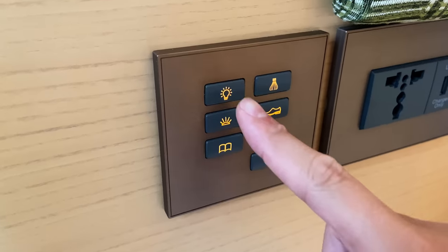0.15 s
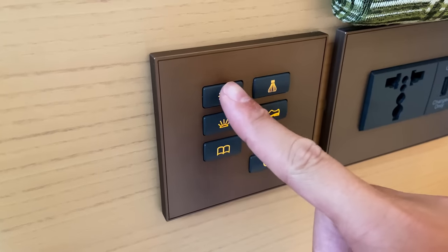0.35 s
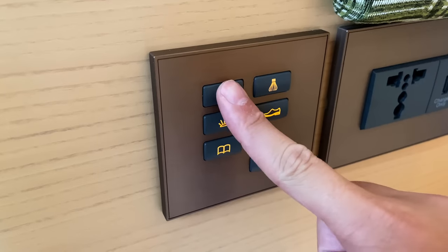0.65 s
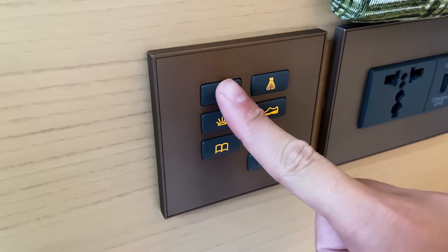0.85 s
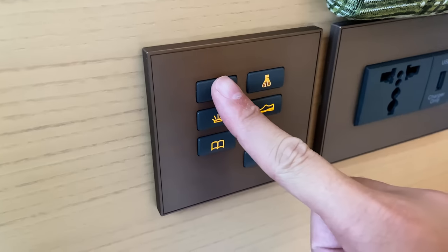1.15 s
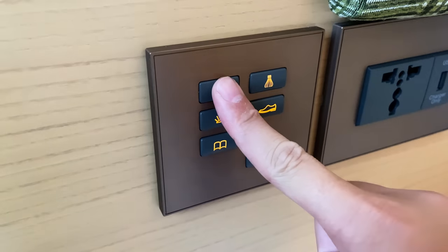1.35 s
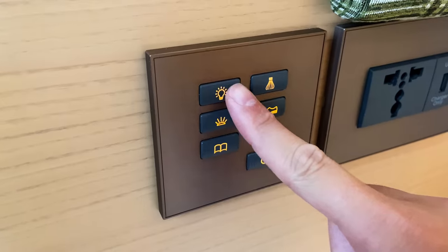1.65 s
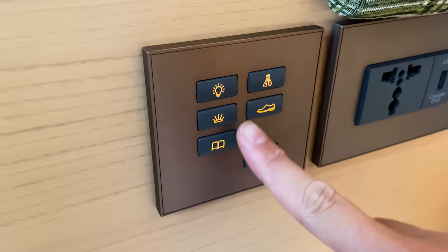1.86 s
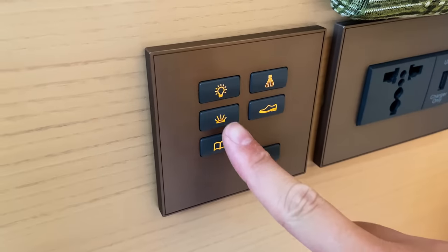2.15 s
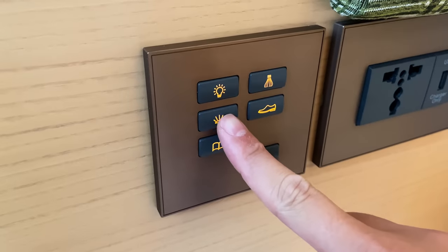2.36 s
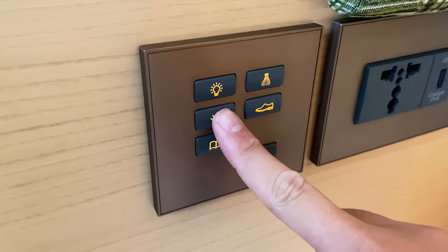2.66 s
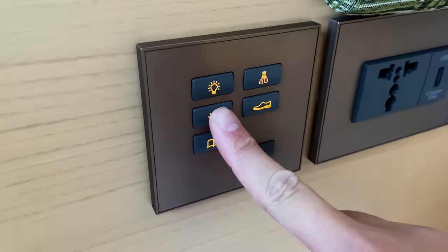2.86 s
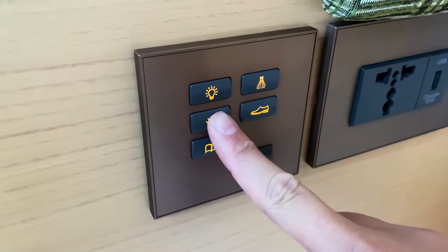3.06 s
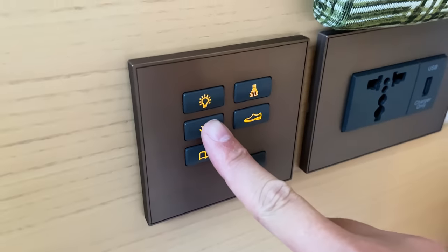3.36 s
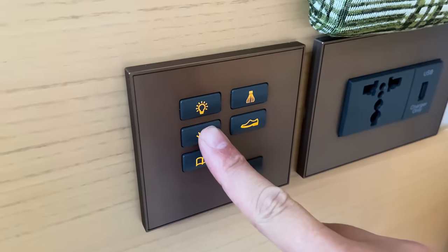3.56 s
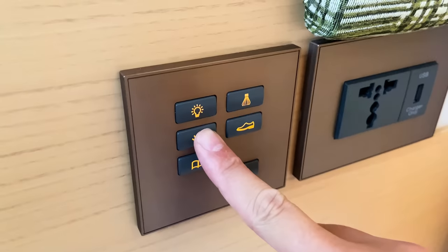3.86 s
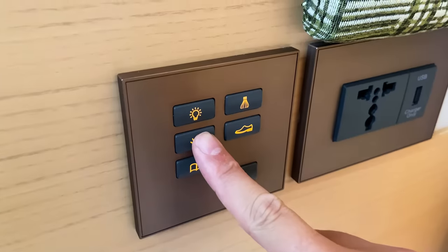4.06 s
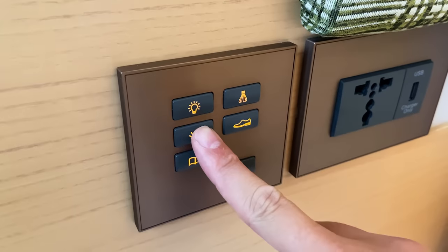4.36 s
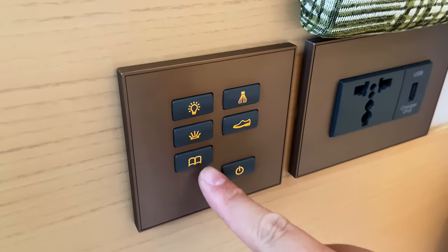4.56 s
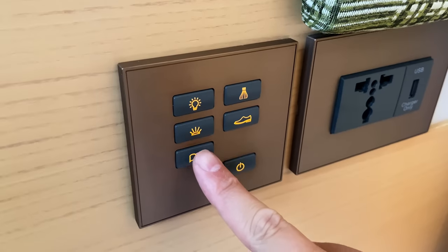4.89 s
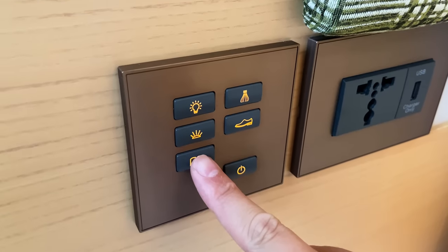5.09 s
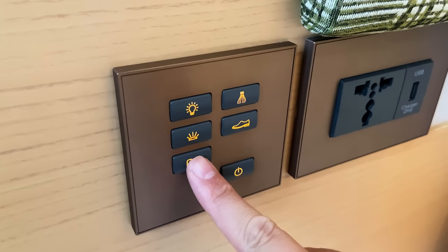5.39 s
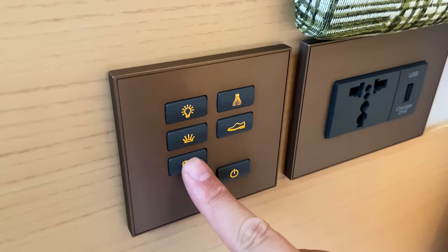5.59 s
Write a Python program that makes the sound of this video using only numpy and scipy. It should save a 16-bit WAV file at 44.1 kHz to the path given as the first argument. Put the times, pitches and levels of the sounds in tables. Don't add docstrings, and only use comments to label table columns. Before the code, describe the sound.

Close stereo pickup of a bedside control panel in a small quiet room. After a tiny knock at the start, one button clicks in and out twice, then a second gets a faint touch and clicks twice. Some soft dull thuds follow, then a third button clicks in and out. Underneath are low town rumble, a far engine slowly rising in pitch, and thin air hiss.

```python
import sys
import numpy as np
from scipy import signal
from scipy.io import wavfile

SR = 44100
rng = np.random.default_rng(int(sys.argv[2]) if len(sys.argv) > 2 else 0)


def transcribe(signal):
    frames = np.atleast_2d(signal).T
    limited = np.clip(frames, -1, 1)
    pcm = np.round(limited * 32767).astype(np.int16)
    wavfile.write(sys.argv[1], SR, pcm)


def level_to_linear(level):
    exponent = np.asarray(level, float) / 20
    return 10 ** exponent


N = 252693

FLOOR_TOP_HZ = 12700
# pitch in Hz, likeness from -1 to 1.
LIKENESS = [(60, .95), (105, .88), (190, .8), (350, .55), (570, -.45), (850, .1), (1250, -.15), (2000, -.2),
            (3100, .1), (6800, -.2), (15000, .2)]
# pitch in Hz, left over right in dB.
LEANING = [(60, 2), (110, -5), (200, -4), (380, 3.5), (700, -3), (1290, 2), (2380, 9), (4400, 1.5),
           (8120, -2), (15000, -2.5)]


def rms_one(x):
    return x / np.sqrt(np.mean(x ** 2) + 1e-20)


def in_time(rows):
    s, *columns = np.transpose(rows)
    return [np.interp(np.arange(N) / SR, s, c) for c in columns]


def at_hz(points, hz, column=1):
    points = np.array(points)
    return np.interp(np.log(hz), np.log(points[:, 0]), points[:, column])


def band(x, low_hz, high_hz):
    edges_hz = [low_hz, min(high_hz, .49 * SR)]
    return signal.sosfilt(signal.butter(2, edges_hz, "band", fs=SR, output="sos"), x)


def drift(rate_hz):
    r = np.exp(-80 * np.pi * rate_hz / SR)
    steps = rng.standard_normal(N // 40 + 2002)
    slow = signal.lfilter([1], [1, -2 * r, r * r], steps)[2000:]
    return np.interp(np.arange(N) / 40, np.arange(len(slow)), rms_one(slow))


def sides(left_right_db):
    return level_to_linear(np.array([[.5], [-.5]]) * left_right_db)


def two_ports(mid, side, hz):
    alike = np.clip(at_hz(LIKENESS, hz), -.95, .99)
    apart = np.sqrt((1 - alike) / (1 + alike))
    return mid + apart * side * [[1], [-1]]


def add(out, sound, s):
    i = round(s * SR)
    out[:, i:i + sound.shape[1]] += sound[:, :N - i]


def button(snaps, modes, room_db, low_db, rebound_db, breathes):
    rebound_s, port_lag_s = .0042, .00025
    near, spread, t = np.zeros((2, N)), np.zeros((2, N)), np.arange(3000) / SR
    hz, level_db, t60, lean_db, lead = np.transpose(sorted(modes))[:, :, None]

    as_one = breathes & (hz > 860) & (hz < 1200)
    sign = -np.cumprod(np.where(as_one & np.roll(as_one, 1), 1, -1), axis=0)
    key = (hz > 2000) & (hz < 3900)

    swell = 1 - np.exp(-(t * (hz * 0.85 + 900)) ** 2)
    breath_db = -5 + 7 * np.log2(hz / 1050)
    breath = level_to_linear(breath_db) * (1 - np.exp(-(t / .0013) ** 2))
    swell = np.where(as_one, breath, swell)

    chirp = np.sin(2 * np.pi * 15000 * t / (1 + t / .0012))
    crack = band(level_to_linear(-60 * t / 0.0057) * chirp, 3000, 17500)
    crack = np.array([np.interp(t - port_lag_s, t, crack), crack])
    crack = crack / np.abs(crack).max()

    chances = rng.standard_normal((len(snaps), 2, len(modes), 1))
    for (s, peak_db, tilt_db, crack_db, key_db), chance in zip(snaps, chances):
        scatter_db, slip = .6 * chance[0], .08 * chance[1]
        bright_db = tilt_db * np.log2(np.minimum(hz, 12500) / 3000)
        mode_db = level_db + bright_db + key_db * key + scatter_db
        height = sign * level_to_linear(mode_db - 60 * t / t60) * swell
        turn = 2 * np.pi * hz * t + slip
        left = np.sum(height * level_to_linear(lean_db / 2) * np.sin(turn + lead), axis=0)
        right = np.sum(height / level_to_linear(lean_db / 2) * np.sin(turn), axis=0)
        left *= np.clip((t - port_lag_s) / 0.00016, 0, 1)
        snap = level_to_linear(peak_db) * (0.34 * np.array([left, right]) + level_to_linear(crack_db) * crack)

        first = level_to_linear(room_db - 60 * t / 0.014)
        add(spread, (snap + level_to_linear(low_db) * band(snap, 250, 800)) * first, s - .0002)

        late = round(rebound_s * SR)
        snap[:, late:] += level_to_linear(rebound_db) * band(snap[:, :-late], 1300, 14000)
        add(near, snap, s - .0002)

        creak = band(rng.standard_normal((2, 900)), 2200, 4200) * np.exp(-t[899::-1] / 0.013)
        add(near, level_to_linear(peak_db - 40) * creak, s - t[900])
    return np.array([near, spread])


def panel():
    # start in seconds, peak in dB, brightness in dB per octave, crack in dB,
    # extra level of the modes from 2 to 3.9 kHz in dB.
    top_snaps = [
        (.59823, -23, 0.67, -18, 4),
        (.72178, -18, 2.5, -24, -1.1),
        (1.3049, -23, .5, -17, 4),
        (1.4681, -17.5, 2.1, -24, -1),
    ]
    middle_snaps = [
        (2.4424, -44.5, 3.8, -10, 3),
        (2.7146, -21, 1.3, -20, 0.9),
        (2.9091, -17.5, 1.64, -2.5, -0.5),
        (3.6956, -21.5, 1.2, -11, 0.3),
        (3.87, -18, 2, -2.5, 0.1),
    ]
    bottom_snaps = [
        (5.5738, -19, 1.6, -26, 1.1),
        (5.715, -16, 2.4, -10.5, 1.9),
    ]
    # pitch in Hz, level in dB, time to die by 60 dB in
    # seconds, left over right in dB, lead of the left in radians.
    top_modes = [(393.0, -17.7, 0.0403, -2.5, -1.65), (513.0, -14.8, 0.0934, -0.2, -2.79),
                 (551.0, -19.7, 0.0552, 3.6, 1.82), (638.0, -10.4, 0.0692, -6.0, -2.85),
                 (706.0, -14.1, 0.0499, -7.3, -2.68), (800.0, -5.5, 0.0616, 8.5, 2.44),
                 (890.0, 5.1, 0.0122, 10.3, 2.21), (1069.0, -1.4, 0.0317, 12.9, 0.85),
                 (1158.0, -1.4, 0.0222, -1.4, 0.09), (1261.0, -1.1, 0.0195, 5.8, 1.61),
                 (1515.0, -0.7, 0.0125, -2.8, 1.0), (1592.0, -5.5, 0.0503, 4.3, 1.85),
               (1898.0, -9.6, 0.0343, 8.0, 0.95), (2018.0, -17.1, 0.0347, 2.7, -0.83),
               (2175.0, -3.1, 0.0103, -1.7, 1.99), (2543.0, -21.9, 0.0367, -4.8, -2.71),
               (2750.0, -12.9, 0.0291, -4.0, -2.88), (2932.0, -17.0, 0.0346, 9.8, -2.72),
               (3177.0, -9.4, 0.0298, 1.0, -3.04), (3533.0, -21.2, 0.0252, 0.1, 1.56),
                 (4108.0, 3.0, 0.0089, -0.4, -1.12), (4677.0, -14.3, 0.025, 11.0, 0.56),
                (5337.0, -0.4, 0.0056, 2.4, 0.91), (6043.0, -2.4, 0.0104, 12.2, -0.61),
                (6528.0, -4.8, 0.009, -7.3, 3.12), (6927.0, 4.7, 0.0038, 3.3, 0.04),
                (7808.0, -10.6, 0.0144, 3.1, -1.91), (8898.0, 0.1, 0.0041, 3.2, -2.17),
                (10153.0, -2.4, 0.0033, -4.0, 1.09), (11028.0, -4.1, 0.0081, 2.6, 0.21),
                (11602.0, -12.2, 0.0151, -0.5, -0.04), (12126.0, 9.1, 0.0019, 8.7, -1.19),
                (13254.0, -0.4, 0.014, 0.1, -3.14), (14852.0, -1.8, 0.0053, 3.9, 0.83),
                 (15000, -7.5, 0.0013, 3, .5), (15600, -5, .005, 1, .5)]
    middle_modes = [(376.0, -21.3, 0.0833, -0.1, -0.19), (483.0, -10.1, 0.0305, 3.0, 1.41),
                    (588.0, -7.0, 0.0168, 7.2, 0.45), (705.0, -10.6, 0.0642, -3.8, -0.02),
                    (794.0, -10.5, 0.0738, 1.7, 0.01), (900.0, -11.9, 0.0252, 4.4, 0.42),
                    (1091.0, -4.2, 0.0245, 10.8, 1.13), (1113.0, -10.6, 0.061, 3.1, 0.11),
                    (1223.0, -5.6, 0.0215, 1.6, 1.54), (1490.0, -1.0, 0.0081, 5.2, 1.02),
                    (1570.0, -6.0, 0.0489, 1.7, 1.66), (1865.0, -3.4, 0.0382, 7.9, 0.35),
                  (1956.0, -4.2, 0.024, -5.8, 0.32), (2396.0, -5.7, 0.0166, 0.2, 0.96),
                  (2587.0, -7.2, 0.0323, -3.6, 2.58), (2936.0, -2.4, 0.0222, -3.1, -2.56),
                  (3165.0, 5.6, 0.0101, -0.7, 3.04), (3316.0, -0.9, 0.0137, -3.7, -1.44),
                  (3572.0, -0.1, 0.0091, 6.2, -2.89), (3731.0, -9.3, 0.0199, -0.9, -1.27),
                    (4520.0, -0.1, 0.0116, 2.6, 0.12), (4911.0, -8.7, 0.0132, -9.9, -1.53),
                   (5268.0, 1.4, 0.0071, 14.0, 1.05), (6020.0, -5.8, 0.0131, 2.3, -0.15),
                   (7225.0, -9.9, 0.0201, -0.7, -0.25), (7905.0, -1.9, 0.0069, 10.0, -1.82),
                   (10250.0, -13.5, 0.0133, -1.4, 0.48), (10444.0, -15.8, 0.0093, -4.0, 2.26),
                   (11445.0, -13.3, 0.0074, -6.3, -0.07), (11468.0, 5.3, 0.0027, 1.9, 0.93),
                   (12125.0, 6.4, 0.0042, 4.6, -1.7), (12689.0, 9.6, 0.0016, -5.5, -2.04),
                   (13303.0, 11.1, 0.0033, 5.2, -2.9), (15632.0, -8.0, 0.005, -1.4, -0.26),
                    (13930, 0.2, 0.0056, 1, 1.2), (14200, 2.5, .006, 0.83, 1), (14600, -1, 0.0057, 2, 1.5),
                  (15900, -6.5, .004, 1, 0.48)]
    bottom_modes = [(417.0, -16.6, 0.0766, 2.4, 0.9), (447.0, -14.4, 0.0406, 5.8, 0.65),
                    (494.0, -13.7, 0.0536, 0.7, 0.6), (612.0, -18.3, 0.0563, 7.9, 0.7),
                    (700.0, -9.0, 0.0408, 0.5, -0.23), (845.0, -4.9, 0.0305, 3.1, 2.42),
                    (1001.0, 2.9, 0.0249, 8.1, 1.89), (1074.0, 0.8, 0.0395, 10.3, 1.02),
                    (1162.0, -3.6, 0.0402, 12.7, 0.15), (1346.0, -1.3, 0.0162, 4.1, 1.32),
                    (1544.0, -10.3, 0.0221, 8.1, -1.93), (1671.0, -9.1, 0.0254, 8.4, 2.78),
                  (1959.0, -16.2, 0.0288, 2.2, 0.06), (2055.0, -19.2, 0.0322, -2.1, 2.85),
                  (2385.0, -11.9, 0.0241, -1.5, 2.02), (2575.0, -15.4, 0.0294, -2.9, -3.09),
                  (2829.0, -10.1, 0.0217, 6.0, -2.22), (2946.0, -4.9, 0.0154, 1.1, 3.09),
                  (3193.0, -3.0, 0.0212, -4.1, -2.04), (3655.0, -3.0, 0.0133, -2.1, -1.86),
                    (4179.0, -2.0, 0.0068, 0.1, -1.2), (4684.0, -12.4, 0.0168, -1.3, 1.42),
                   (5310.0, -3.7, 0.0087, 7.4, 2.21), (5797.0, -12.1, 0.0156, 14.0, 0.66),
                   (6397.0, 2.8, 0.0027, 8.4, 2.41), (7301.0, -15.6, 0.0113, -14.0, 0.17),
                   (7877.0, -3.7, 0.0052, 5.5, 2.67), (10007.0, -8.5, 0.0039, 7.8, 1.6),
                   (11152.0, -23.5, 0.014, 0.5, -0.84), (11176.0, -0.8, 0.0018, 0.0, -0.76),
                   (12323.0, -6.5, 0.0032, 6.9, -1.71), (13057.0, 8.0, 0.0049, -0.1, 3.05),
                   (13157.0, 9.2, 0.0047, 0.5, 3.01), (14638.0, 1.3, 0.0024, 8.0, 1.28),
                    (1120, -16, .07, 7.2, 0.39), (14070, -2.2, 0.0061, 3, 0.56), (15870, -10, .005, 3, 0.94)]

    top = button(top_snaps, top_modes,
                 room_db=4.5, low_db=-9.0, rebound_db=-21.0, breathes=True)
    middle = button(middle_snaps, middle_modes,
                    room_db=5.5, low_db=8.5, rebound_db=-23.0, breathes=False)
    bottom = button(bottom_snaps, bottom_modes,
                    room_db=5.5, low_db=10.5, rebound_db=-10.5, breathes=True)
    return top + middle + bottom


def knocks():
    # start in seconds, peak in dB, pitch in Hz, left over right in dB.
    knock_rows = [(.0142, -45, 1900, -10), (.0144, -34, 1090, -3), (.016, -35, 475, 6),
                  (.0181, -41, 475, 6), (.0395, -51, 1100, -7), (.0635, -47, 1100, -8),
                  (.111, -59, 900, -3), (2.4432, -46, 1300, 5), (2.444, -52.5, 3860, 21),
                  (2.4462, -43, 1900, 8), (2.4478, -44, 1900, 8), (4.28, -53.5, 855, -1),
                  (4.366, -60, 2420, 6), (4.368, -53, 2000, 10), (4.563, -56, 1180, 11),
                  (4.925, -57, 1600, 4), (4.924, -57, 2400, 4), (4.925, -48, 744, 1), (4.927, -44, 300, 1),
                  (4.941, -36, 125, -3), (4.963, -34, 110, -3), (5.0, -33, 125, -3), (5.166, -55, 1470, 4)]
    # start in seconds, peak in dB, highest pitch in Hz.
    tick_rows = [
        (0.015, -56, 10500),
        (.111, -64, 12400),
        (4.367, -68, 10500),
        (5.165, -56, 17000),
    ]
    out, t = np.zeros((2, N)), np.arange(2000) / SR
    for s, peak_db, hz, lean_db in knock_rows:
        t60 = 0.0075 * (1000 / hz) ** 0.24
        ring = np.sin(2 * np.pi * hz * t) * (1 - np.exp(-t * hz * 3.4))
        add(out, sides(lean_db) * level_to_linear(peak_db - 60 * t / t60) * ring, s)
    for s, peak_db, top_hz in tick_rows:
        burst = band(band(rng.standard_normal((2, len(t))), 1200, top_hz), 700, top_hz)
        add(out, level_to_linear(peak_db - 60 * t / 0.0091) * burst, s)
    return out


def thuds():
    # start in seconds, level in dB, lowest pitch in Hz, highest pitch in Hz,
    # time to die by 60 dB in seconds.
    thud_rows = [(0.011, -65, 1400, 3000, 0.083), (2.392, -80.5, 3700, 4500, 0.52),
                 (4.392, -73.5, 1590, 4400, 0.18), (4.59, -70, 510, 2970, 0.17),
                 (4.77, -55, 145.7, 298, 0.14), (4.922, -57.5, 480, 2620, 0.28),
                 (4.927, -46, 110, 280, 0.29), (4.983, -44, 95, 230, 0.16), (4.935, -55, 350, 720, 0.22),
                 (5.5, -56, 82, 140, 0.31)]
    out, t = np.zeros((2, N)), np.arange(15000) / SR
    for s, level_db, low_hz, high_hz, t60 in thud_rows:
        mid, side = rng.standard_normal((2, len(t)))
        lumps_db = 3 * drift(60)[:len(t)]
        noise = mid + 0.68 * side * [[1], [-1]]
        burst = rms_one(band(band(noise, low_hz, high_hz), low_hz, high_hz))
        onset = 1 - np.exp(-t / 0.0016)
        add(out, burst * level_to_linear(level_db + lumps_db - 60 * t / t60) * onset, s)
    return out


def bedroom(x):
    # pitch in Hz, time to die by 60 dB in seconds, level in dB.
    decay = [(400, 0.16, -21), (1000, 0.2, -29.5), (2010, 0.25, -32), (2730, 0.22, -31),
             (3470, 0.22, -33.5), (4000, .2, -35), (4500, 0.28, -38.5), (6000, .21, -38), (7460, 0.18, -35),
             (9000, 0.089, -33.5), (10600, 0.21, -40.5), (12180, 0.24, -51), (13300, 0.32, -46.5),
             (14460, .2, -41), (16200, 0.12, -55)]
    # pitch in Hz, time to die by 60 dB in seconds, level in dB.
    box_rings = [
        (2970, .15, -58),
        (4690, 0.19, -54),
    ]
    t, edges, reply = np.arange(SR // 2) / SR, np.geomspace(300, 17500, num=40), 0
    white = rng.standard_normal((2, 2, len(t)))
    for k, (low, high) in enumerate(zip(edges, edges[1:])):
        hz = np.sqrt(low * high)
        fade_db = at_hz(decay, hz, column=2) - 60 * t / at_hz(decay, hz)
        reply = reply + band(white[k % 2], low, high) * level_to_linear(fade_db)

    airy = signal.sosfilt(signal.cheby1(5, 1, (13850, 15650), "band", fs=SR, output="sos"), reply)
    airy = airy / (1 + (t / .085) ** 8)
    reply = signal.sosfilt(signal.cheby1(10, 1, FLOOR_TOP_HZ, fs=SR, output="sos"), reply) + airy
    for hz, t60, db in box_rings:
        reply = reply + level_to_linear(db - 60 * t / t60) * rms_one(band(white[0], .95 * hz, 1.05 * hz))

    nearby = 1.3 * level_to_linear(-60 * t / 0.065) * (t > .005)
    build_up = 1 - np.exp(-(t / .034) ** 1.4)
    reply = nearby * band(reply, 100, 7000) + reply * build_up
    return signal.fftconvolve(x, reply, axes=1)[:, :N]


def engine():
    # time in seconds, firing pitch in Hz.
    firing = [(0, 44.3), (.9, 48.4), (1.2, 52.8), (2.2, 61), (2.7, 63.8), (3.45, 69.4), (4.4, 75.2),
              (5.3, 79.5)]
    # pitch in Hz, half width in Hz, level in dB.
    wall_modes = [(45.7, 0.43, -52.5), (52.37, 0.93, -43.5), (55.78, 0.99, -39), (58.36, 0.46, -39.5),
                  (61.03, 1.22, -34), (64.47, 0.33, -42.5), (65.65, 0.45, -46), (67.84, 0.34, -49),
                  (70.52, 0.94, -43.5), (72.23, 0.34, -50.5), (73.1, 1.3, -54.5), (75.3, 0.44, -52),
                  (76.86, 0.47, -57.5), (77.8, 0.076, -53)]
    gear_s, gear_hz, sag_hz_per_s = 5.55, 78.2, 90
    leak_db = -60.5
    surge_db, surge_after_s, surge_width_s = -44.5, 0.099, 0.045
    after = np.arange(N) / SR - gear_s
    hz = np.where(after < 0, in_time(firing)[0], gear_hz - sag_hz_per_s * after)
    level = level_to_linear(leak_db)
    for top_hz, width_hz, db in wall_modes:
        level = level + level_to_linear(db) * np.exp(-.5 * ((hz - top_hz) / width_hz) ** 2) * (after < 0)
    level = level + level_to_linear(surge_db) * np.exp(-.5 * ((after - surge_after_s) / surge_width_s) ** 2)
    turn = 2 * np.pi * np.cumsum(hz) / SR + 0.22 * drift(12.0)
    left_lags = np.clip(1.0 - 0.05 * (hz - 60), 0, 1.2)
    return np.sqrt(2) * level * sides(-3.6) * np.sin(turn - left_lags * [[1], [0]])


def banded_noise(spectrum, patchy_db):
    low_end, high_end = spectrum[0][0], spectrum[-1][0]
    edges = np.geomspace(low_end, high_end, round(3 * np.log2(high_end / low_end)))
    out = 0
    white = rng.standard_normal((2, 2, N + 8000))
    for k, (low, high) in enumerate(zip(edges, edges[1:])):
        mid, side = band(white[k % 2], low, high)[:, 8000:]
        hz = np.sqrt(low * high)
        gain = level_to_linear(at_hz(spectrum, hz) + patchy_db * drift(8.8)) * sides(at_hz(LEANING, hz))
        out = out + gain * two_ports(mid, side, hz)
    return out / np.sqrt(np.mean(out.mean(axis=0) ** 2))


def ventilation_hiss():
    # pitch in Hz, level in dB per Hz.
    spectrum = [(200, -30), (290, -3), (400, 1), (545, -19), (620, -7.5), (800, -13), (1100, -10),
                (1900, -12), (2550, -15), (3000, -20.5), (4500, -21), (8100, -26.5), (11200, -29.5),
                (12400, -28.5), (13500, -40)]
    level_db = -78.5 + 4 * np.exp(-np.arange(N) / SR / 0.14)
    hiss = level_to_linear(level_db) * banded_noise(spectrum, patchy_db=1.66)
    duct = signal.cheby1(6, 1, 2650, fs=SR, output="sos")
    return hiss + signal.sosfiltfilt(duct, hiss)


def whistles():
    # pitch in Hz, width in Hz, level in dB.
    tones = [(9370, 150, -98.5), (10440, 340, -95), (10040, 3000, -90.5), (261.2, 0.42, -75.5),
             (190.1, 23, -66), (228.8, 12, -75.5), (820, 170, -79)]
    out, t = 0, np.arange(N) / SR
    for hz, width_hz, level_db in tones:
        mid, side = rng.standard_normal((2, N))
        r = np.exp(-np.pi * width_hz / SR)
        poles = [1, -2 * r * np.cos(2 * np.pi * hz / SR), r * r]
        sound = two_ports(mid, side, hz)
        for _ in range(2):
            sound = signal.lfilter([1], poles, sound)
        swell_db = 2.6 * drift(2.5)
        on = np.clip((t - 0.096 * (hz > 5000)) / .03, 0, 1)
        out = out + on * level_to_linear(level_db + swell_db) * rms_one(sound) * sides(at_hz(LEANING, hz))
    return out


def town_rumble():
    # pitch in Hz, level in dB per Hz.
    spectrum = [(15, -34.5), (30, -19.5), (45, 0.5), (80, 8.5), (105, 7.5), (150, -11), (190, 1),
                (230, -14.5), (260, -25), (300, -28), (400, -38)]
    # time in seconds, level in dB.
    traffic = [(0.0, -61.5), (0.61, -58), (0.78, -58), (1.23, -60.5), (1.74, -57.5), (2.01, -60.5),
               (2.23, -60), (2.34, -60), (3.02, -60), (3.67, -57.5), (4.63, -59.5), (5.01, -58.5),
               (5.25, -57.5), (5.73, -57.5)]
    traffic_db, = in_time(traffic)
    level_db = -53.5 + .8 * (traffic_db - traffic_db.mean()) + 1.14 * drift(3.4)
    return level_to_linear(level_db) * banded_noise(spectrum, patchy_db=1.55)


def scene():
    near, spread = panel()
    small = knocks()
    room = bedroom(spread + level_to_linear(-1.0) * small)
    ducts = signal.butter(8, FLOOR_TOP_HZ, fs=SR, output="sos")
    air = signal.sosfilt(ducts, ventilation_hiss() + whistles())
    return near + small + room + thuds() + engine() + town_rumble() + air


def low_pass(x):
    return signal.sosfilt(signal.butter(12, 17080, fs=SR, output="sos"), x)


def record(dry):
    faded_in = dry * (1 - np.exp(-np.arange(N) / SR / 0.00081))
    notched = signal.sosfilt(signal.butter(2, (13050, 13400), "bandstop", fs=SR, output="sos"), faded_in)
    cut = signal.sosfilt(signal.cheby2(12, 70, 17300, fs=SR, output="sos"), notched)
    return low_pass(cut)


dry = scene()
out = record(dry)
transcribe(out)
```